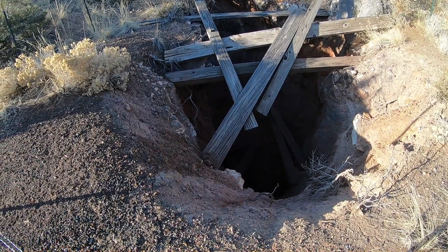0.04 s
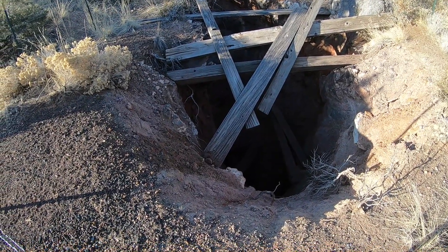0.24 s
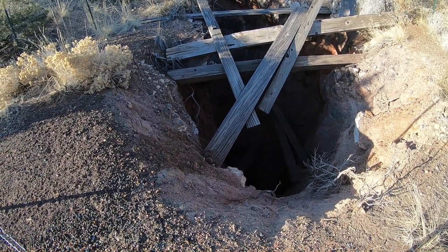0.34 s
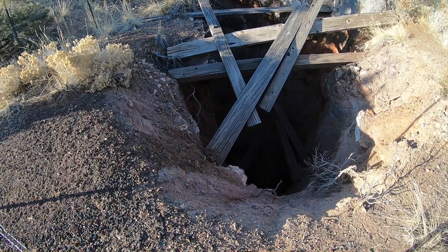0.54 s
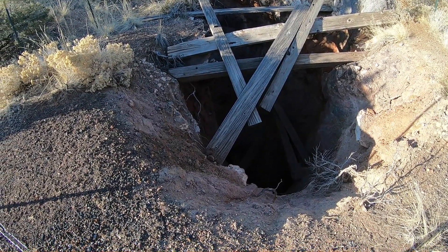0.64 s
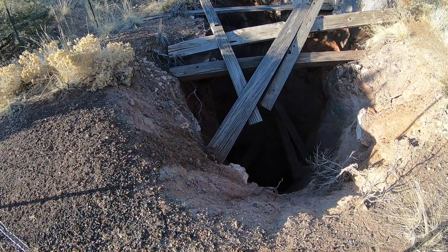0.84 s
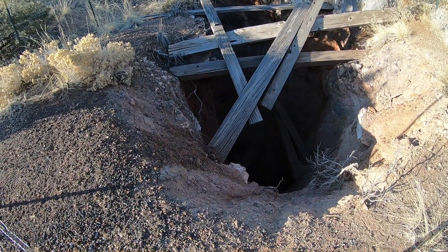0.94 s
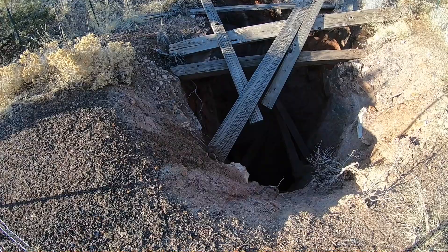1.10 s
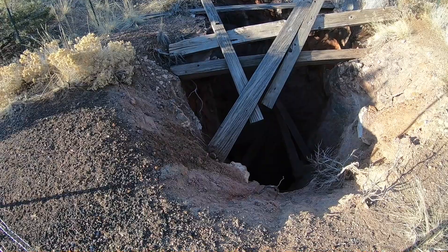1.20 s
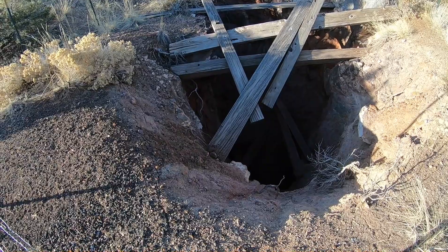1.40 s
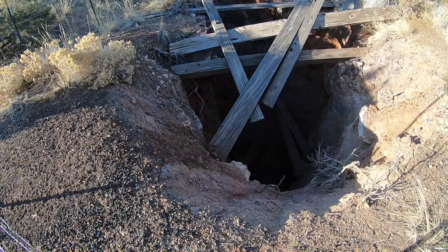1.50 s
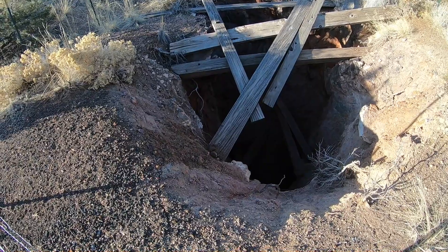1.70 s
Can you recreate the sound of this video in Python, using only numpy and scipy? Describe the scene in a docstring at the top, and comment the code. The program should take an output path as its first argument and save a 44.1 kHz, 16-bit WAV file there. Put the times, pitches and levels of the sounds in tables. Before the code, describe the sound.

Dirt and stones slide down an open, dry shaft, hissing from the start over a brief rattle of rubble. At about 0.2 seconds something heavy lands inside with a low, hollow thump, the loudest moment. The hiss thins and fades while scattered pebbles tick faintly on the walls until about 1.6 seconds. Light wind rumbles on the microphone throughout, gusting a little around 1.3 seconds.

```python
"""Loose dirt and stones run down an open, dry shaft: a hiss of grit over a brief rattle of rubble.
Something heavy lands deep inside and rings the air column with a low thump. The hiss dies away,
dull parts first, and a few late pebbles tick on the walls. Light wind buffets the two
microphone ports over a quiet outdoor background."""
import sys
import numpy as np
from scipy import signal
from scipy.fft import rfft, irfft, next_fast_len
from scipy.io import wavfile
from scipy.ndimage import map_coordinates

SR = 44100
rng = np.random.default_rng(int(sys.argv[2]) if len(sys.argv) > 2 else 0)


def unload_wav(signal):
    """Save mono or channel-first audio to the path in sys.argv[1] as 16-bit WAV at rate SR, clipped to [-1, 1]."""
    wavfile.write(
        sys.argv[1],
        SR,
        np.round(np.clip(np.atleast_2d(signal).T, -1, 1) * 32767).astype(np.int16),
    )


N = 77175
TIME_S = np.arange(N) / SR


# grit spectrum before the fade: f/Hz, relative density/dB
GRIT_SPECTRUM = [(150, 10), (400, 4), (750, 5.5), (1050, -3), (1450, 4.5), (2100, -0.5), (2800, -0.5),
                 (4200, -6), (4700, -9.5), (5400, -9.5), (6300, -7), (7100, -13), (8100, -23.5),
                 (12500, -35.5), (14500, -50)]
# left-right likeness of the grit: f/Hz, correlation
GRIT_CORRELATION = [(200, 0.72), (1000, 0), (2500, 0.82), (5000, 0.96), (8000, .1), (12000, 0.12)]
# fade of the hiss: f/Hz, rate/(dB/s)
GRIT_FADE_RATE = [(400, 27.4), (1000, 28.5), (2500, 19.6), (4500, 16.1), (6500, 11.06), (12000, 12)]
# amount of grit running, on top of the fade: t/s, level/dB
GRIT_FLOW = [(0, 2), (.18, 0.5), (.36, 2), (.48, 4), (.58, 3.5), (.68, 2.5), (.8, 0.5), (.93, 2.5),
             (1.02, -1), (1.18, 1), (1.399, -2.5), (1.75, 0)]
SLIDE_PAN_DB = -3

def grit(level_db=-49, grains_per_s=1000, grain_db=-6, flicker_db=1.3):
    """Sliding sand hisses, with single grains in it; each frequency fades at its own rate."""
    grains = (rng.random(N) < grains_per_s / SR) * rng.standard_normal((2, N))
    sand = rng.standard_normal((2, N)) + amp(grain_db) * unit_rms(grains)
    hiss = stereo(sand, lambda hz: log_interp(GRIT_SPECTRUM, hz),
                  lambda hz: log_interp(GRIT_CORRELATION, hz))
    bin_hz, frame_s, frames = signal.stft(hiss, SR, nperseg=512)
    fade = amp(-log_interp(GRIT_FADE_RATE, bin_hz)[:, None] * frame_s)
    fading_hiss = signal.istft(frames * fade, SR, nperseg=512)[1][:, :N]
    flow_db = np.interp(TIME_S, *np.transpose(GRIT_FLOW)) + flicker_db * wobble(59.6)
    return fading_hiss * amp(level_db + flow_db) * pan(SLIDE_PAN_DB)


# coarse rubble: f/Hz, relative density/dB
RUBBLE_SPECTRUM = [(100, -23.5), (400, -11.5), (570, 1.5), (820, 2.5), (1000, -5.5), (1500, -16.5),
                   (3000, -44), (8000, -57)]

def rubble(level_db=-57, rattle_db=4, stop_s=0.15, t60_s=0.062):
    """Coarse stones tumble ahead of the grit and stop just before the landing."""
    release_db = -60 * np.maximum(TIME_S - stop_s, 0) / t60_s
    tumble = shaped_noise(RUBBLE_SPECTRUM, correlation=1.0)
    return tumble * amp(level_db + release_db + rattle_db * wobble(77)) * pan(SLIDE_PAN_DB)


# heavy landing and rebound: t/s, level/dB
LANDING_BLOWS = [(0.2089, -10), (0.2303, -15)]
# air column modes: f/Hz, level re blow/dB, t60/s
SHAFT_MODES = [(91.2, -3.5, 0.16), (108.8, -1.5, 0.21), (129.6, -5.5, 0.054), (204.7, -9, 0.23),
               (224, -17, 0.13), (292, -21, 0.14), (454, -23, 0.12)]
# echo in the shaft: f/Hz, relative density/dB
BOOM_SPECTRUM = [(30, -44), (65, -2.5), (105, -5.5), (200, -8.5), (300, -30.5), (370, -33), (460, -30),
                 (600, -40.5), (1200, -45.5), (4000, -88)]

def thump(boom_db=-22, thump_low_cut_hz=58):
    """Each blow rings the shaft's air column; a diffuse boom follows the first."""
    ring = 0
    for start_s, blow_db in LANDING_BLOWS:
        for hz, mode_db, t60_s in SHAFT_MODES:
            envelope = amp(blow_db + mode_db) * strike(start_s, attack_s=0.003, t60_s=t60_s)
            ring += envelope * np.sin(2 * np.pi * hz * (TIME_S - start_s))
    boom_envelope = amp(boom_db) * strike(LANDING_BLOWS[0][0], attack_s=0.0034, t60_s=0.4)
    boom = boom_envelope * shaped_noise(BOOM_SPECTRUM, correlation=0.8)
    return low_cut(ring + boom, thump_low_cut_hz)


# stones on the walls: t/s, level/dB, f/Hz, width/octaves, t60/s, pan L-R/dB
STONE_HITS = [(.001, -35.5, 1850, 0.67, 0.04, -3.5), (0.205, -46, 2000, 0.6, 0.18, -3.5),
              (0.294, -50, 800, 0.25, 0.14, -6), (0.324, -46, 1520, 0.48, 0.061, -7),
              (0.426, -52, 2700, 0.22, 0.13, 0.5), (0.642, -54.5, 1470, 0.13, 0.21, -1),
              (0.74, -58, 6900, 0.12, 0.098, -1), (0.754, -57.5, 2850, 0.38, 0.056, -1),
              (0.781, -60.5, 2200, 0.38, 0.099, -4), (0.979, -67, 1670, 0.17, 0.13, 15),
              (1.05, -65, 1450, 0.16, 0.2, -7), (1.18, -69.5, 6400, 0.44, .12, 3),
              (1.291, -68.5, 1550, 0.34, 0.33, -0.5), (1.531, -68.5, 1570, .2, 0.36, 4),
              (1.563, -64, 6200, 0.3, 0.15, -4.5)]

def stones():
    """Stones strike the shaft in short clacks, smeared by its walls."""
    clacks = 0
    for start_s, level_db, hz, width_oct, t60_s, pan_db in STONE_HITS:
        envelope = amp(level_db) * strike(start_s, attack_s=0.0014, t60_s=t60_s)
        clacks += envelope * noise_band(hz, width_oct, correlation=0.52) * pan(pan_db)
    return clacks


# wind on the ports: t/s, level/dB, pan L-R/dB
WIND_GUSTS = [(0, -36.5, 0), (.09, -44.5, -11), (.15, -37, -12), (0.241, -40, -10), (.34, -37.5, 3.5),
              (0.438, -33.5, -10.5), (.53, -46.5, -7), (.66, -38.5, -11), (.78, -35, -1), (0.871, -32, 0.5),
              (.97, -33.5, -1.5), (1.031, -37.5, -10.5), (1.101, -39, -6.5), (1.22, -32, -5),
              (1.31, -26, 1.5), (1.48, -33.5, 1), (1.57, -37, -0.5), (1.658, -40, 2), (1.75, -33, 3)]
# buffeting pressure: f/Hz, relative density/dB
BUFFET_SPECTRUM = [(15, -3), (30, -0.5), (55, 3), (90, 0), (130, -8.5), (180, -20), (250, -21), (330, -37),
                   (480, -44.5), (900, -79), (3000, -100)]

def wind(lump_db=2.25, ring_offset_db=-39, ring_db_per_db=0.56):
    """Lumpy pressure shifts from port to port; the ports add a faint breathy ring."""
    times_s, levels_db, pans_db = np.transpose(WIND_GUSTS)
    gust_db = np.interp(TIME_S, times_s, levels_db)
    balance = pan(np.interp(TIME_S, times_s, pans_db))
    lumps = amp(lump_db * np.array([wobble(30.26), wobble(30.25)]))
    buffet = unit_rms(lumps * shaped_noise(BUFFET_SPECTRUM, correlation=0.14))
    ring = noise_band(centre_hz=1376, width_oct=0.13, correlation=0.092)
    ring_db = gust_db.mean() + ring_offset_db + ring_db_per_db * (gust_db - gust_db.mean())
    return amp(gust_db) * balance * buffet + amp(ring_db) * ring


# single eddies: t/s, level/dB, f/Hz, pan L-R/dB
EDDY_PUFFS = [(.12, -34, 67.4, -14.5), (0.343, -24, 115.5, 0), (0.608, -27, 195, -10),
              (0.626, -31.5, 83, -11), (.845, -29, 125, 14), (.872, -28, 63, -8),
              (1.006, -25.5, 62.3, -3.5), (1.168, -24.5, 112.5, 6.5), (1.275, -23.5, 112, -11),
              (1.332, -21, 128, 12), (1.391, -23.5, 97.3, 13.5), (1.459, -23, 79.2, 1.5)]

def eddies(rise_cycles=0.76):
    """Each eddy hits the ports with a few pressure swings, rising faster than it dies."""
    puffs = 0
    for start_s, level_db, hz, pan_db in EDDY_PUFFS:
        cycles = np.maximum(TIME_S - start_s, 0) * hz
        age = cycles / rise_cycles
        envelope = (age * np.exp(1 - age)) ** 2
        swings = np.cos(2 * np.pi * (cycles + rng.random((2, 1))))
        puffs += amp(level_db) * pan(pan_db) * envelope * swings
    return puffs


# outdoor background: f/Hz, relative density/dB
AIR_SPECTRUM = [(100, 15), (300, 3.5), (500, -2.5), (780, 9.5), (1050, -1.5), (1400, -8.5), (2300, -9.5),
                (4500, -14), (6500, -32.5), (8000, -18), (12500, -21), (14500, -43.5)]

def outdoor_air(level_db=-66.5):
    """A faint, steady, wide hush."""
    return amp(level_db) * shaped_noise(AIR_SPECTRUM, correlation=0.083)


def amp(db):
    """Decibels to gain."""
    return 10 ** (np.asarray(db) / 20)


def unit_rms(x):
    """Scale to rms 1."""
    return x / np.sqrt(np.mean(x ** 2) + 1e-20)


def log_interp(points, hz):
    """Interpolate (f/Hz, value) points on a log frequency axis."""
    points_hz, values = np.transpose(points)
    return np.interp(np.log(hz + 1), np.log(points_hz + 1), values)


def pan(db):
    """Left and right gains for an L-R level difference."""
    return amp(db * np.array([[0.5], [-0.5]]))


def wobble(knots_per_s):
    """Smooth random curve."""
    knots = rng.standard_normal(int(N * knots_per_s / SR) + 4)
    return map_coordinates(knots, [TIME_S * knots_per_s])


def strike(start_s, attack_s, t60_s):
    """Envelope: quick rise, exponential decay."""
    age_s = np.maximum(TIME_S - start_s, 0)
    return (1 - np.exp(-age_s / attack_s)) * np.exp(-np.log(1000) * age_s / t60_s)


def low_cut(x, hz):
    """Second-order high-pass."""
    return signal.sosfilt(signal.butter(2, hz, "high", fs=SR, output="sos"), x)


def filtered(x, gain_at):
    """Zero-phase filter with gain_at(hz)."""
    size = next_fast_len(N + SR // 2)
    return irfft(rfft(x, size) * gain_at(np.fft.rfftfreq(size, 1 / SR)), size)[..., :N]


def stereo(pair, db_at, correlation_at):
    """Colour two unrelated signals and blend them to a left-right correlation, rms 1."""
    def mid_side_gains(hz):
        angle = np.arccos(np.clip(correlation_at(hz), -1, 1)) / 2
        return amp(db_at(hz)) * [np.cos(angle), np.sin(angle)]
    mid, side = filtered(pair, mid_side_gains)
    return unit_rms(np.array([mid + side, mid - side]))


def shaped_noise(spectrum, correlation):
    """Stereo noise with a given spectrum, rms 1."""
    white = rng.standard_normal((2, N))
    return stereo(white, lambda hz: log_interp(spectrum, hz), lambda hz: np.full_like(hz, correlation))


def noise_band(centre_hz, width_oct, correlation):
    """Stereo noise in one resonance, its top rolled off like the grit's, rms 1."""
    def band_db(hz):
        detune = np.log2((hz + 1) / centre_hz) / width_oct
        knee_db = log_interp(GRIT_SPECTRUM, max(centre_hz, 6500))
        rolloff_db = np.minimum(0, log_interp(GRIT_SPECTRUM, hz) - knee_db)
        return rolloff_db - 20 * np.log10(1 + detune ** 2 / 2)
    return stereo(rng.standard_normal((2, N)), band_db, lambda hz: np.full_like(hz, correlation))


def scene():
    """The shaft, the wind and the air around them."""
    return grit() + rubble() + thump() + stones() + wind() + eddies() + outdoor_air()


def record(dry, low_hz=13, top_hz=14200, fade_s=0.006):
    """Soft ends; the microphone passes only its own band."""
    to_edge_s = np.minimum(TIME_S, TIME_S[-1] - TIME_S)
    fades = np.sin(np.pi / 2 * np.minimum(1, to_edge_s / fade_s))
    return filtered(low_cut(dry, low_hz) * fades, lambda hz: hz < top_hz)


dry = scene()
out = record(dry)
unload_wav(out)
```